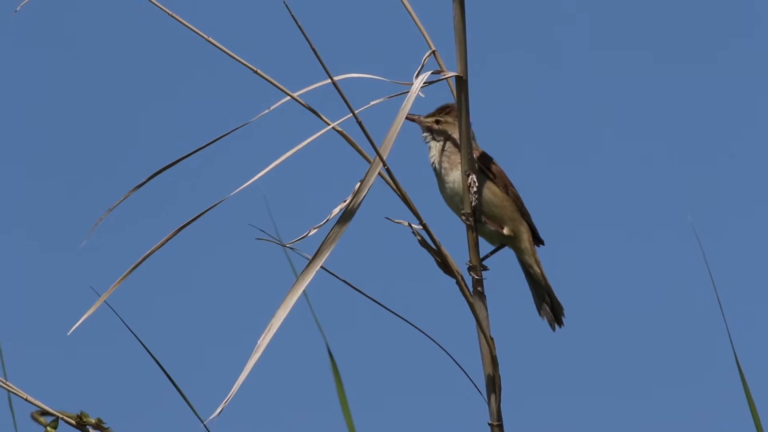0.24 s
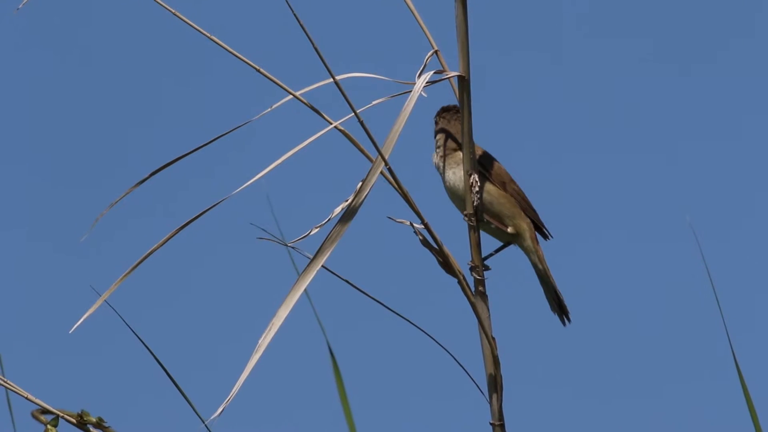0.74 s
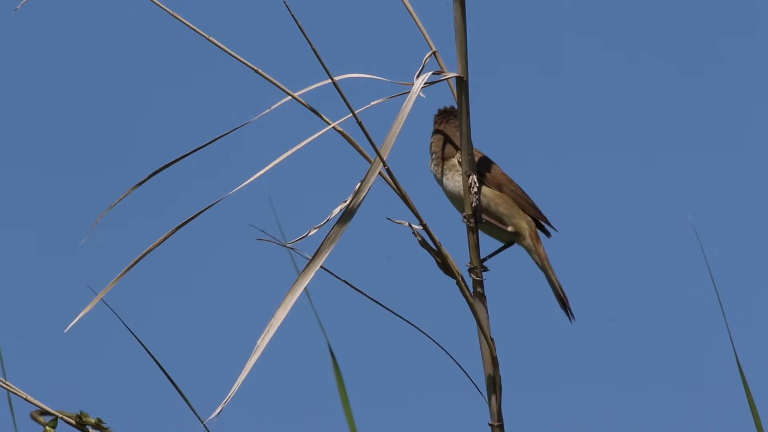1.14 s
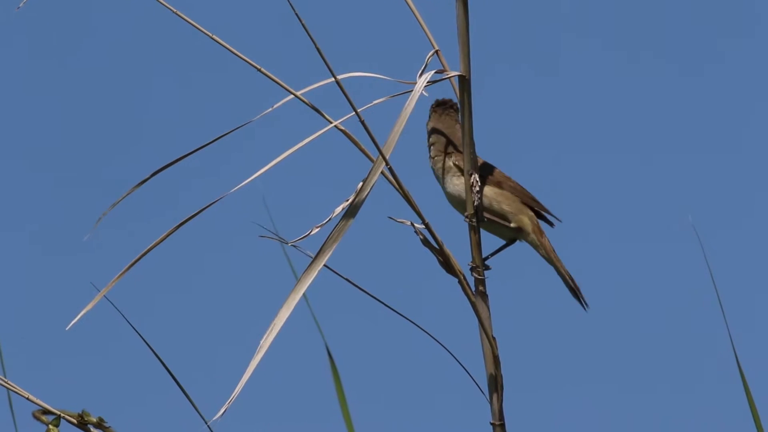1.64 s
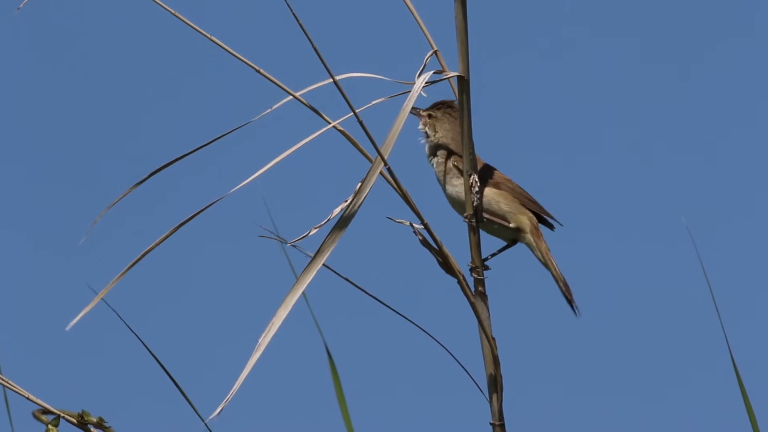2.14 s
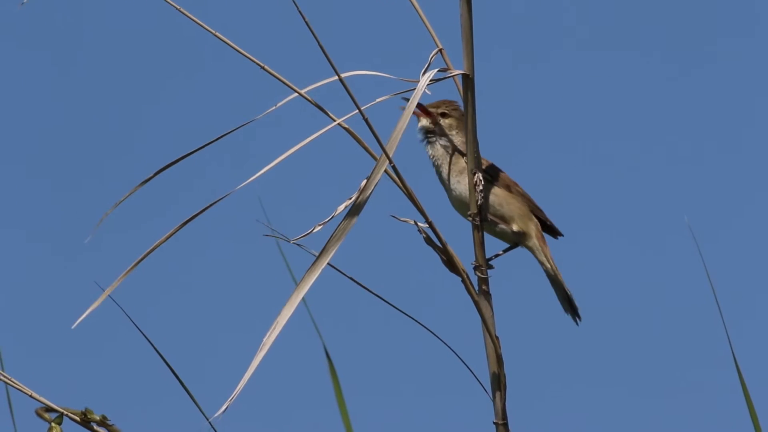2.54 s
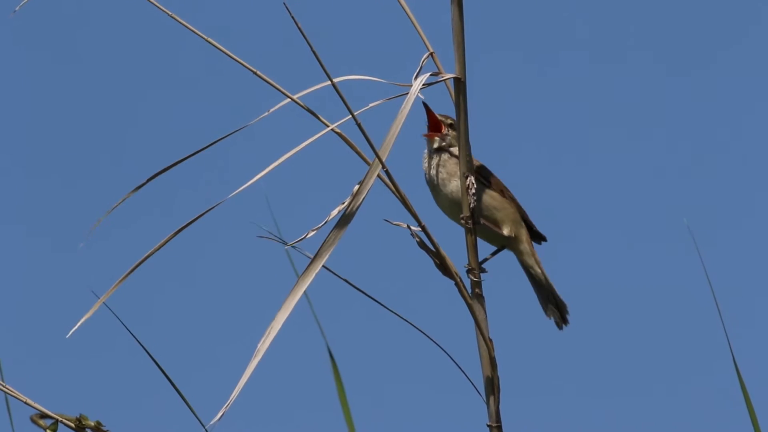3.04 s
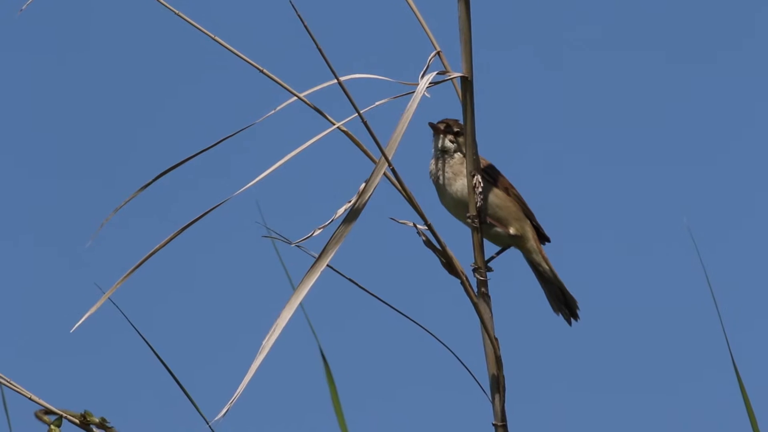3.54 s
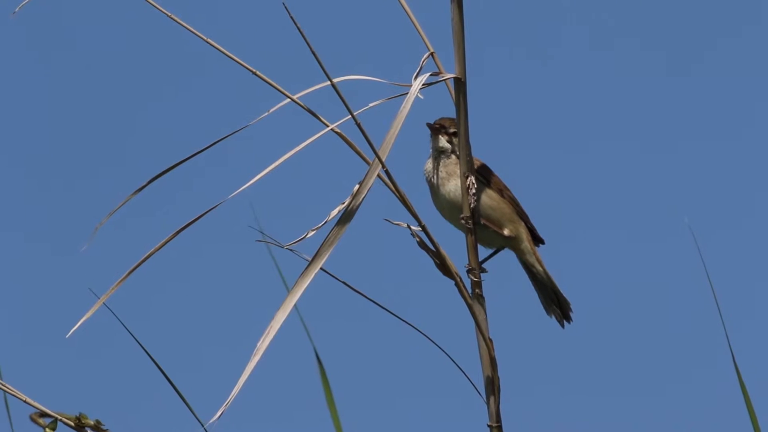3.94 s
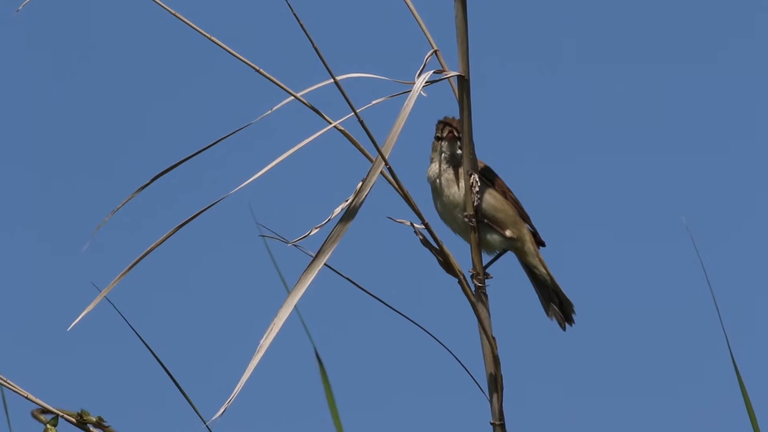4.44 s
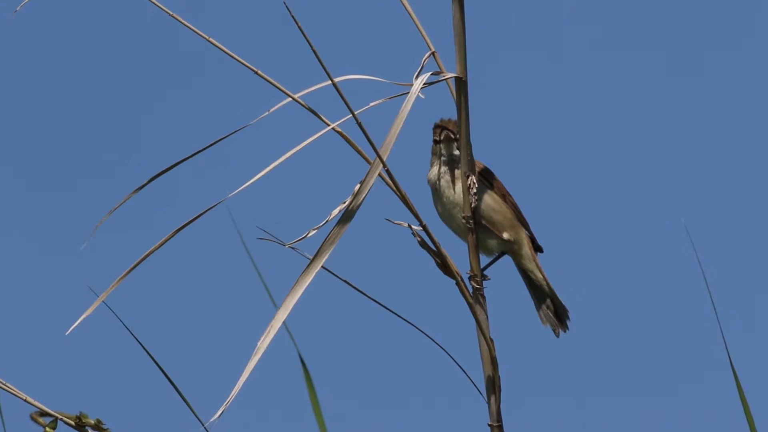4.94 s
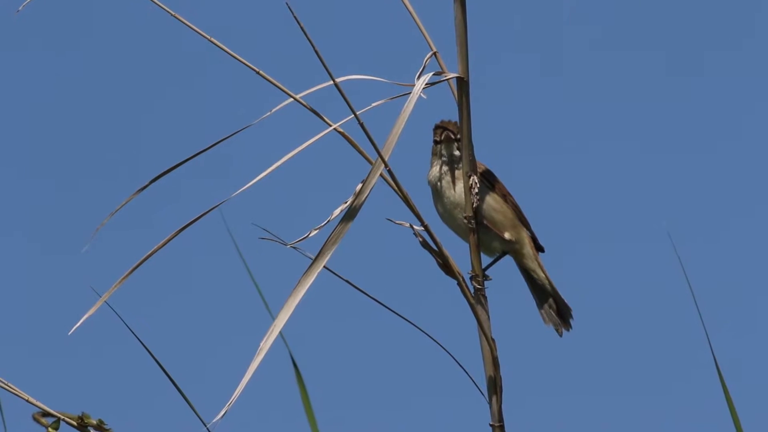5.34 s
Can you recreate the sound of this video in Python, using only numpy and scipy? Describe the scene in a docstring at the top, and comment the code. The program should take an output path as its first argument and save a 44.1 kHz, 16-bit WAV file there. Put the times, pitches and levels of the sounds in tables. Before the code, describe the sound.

Harsh, rhythmic reed warbler song with paired croaks, rattling trills and sharp whistles, then a pause and two soft creaks, outdoors.

```python
"""A steady outdoor rush, shaped noise, runs throughout, with faint rasps and chirps of far birds now and then.
Close by, a reed warbler sings four 'kr-ko' pairs: overtone-rich pulse trains, then fluttering tones.
Runs of fluttering bursts grate between paired arched whistles; short creaks lead into three loud,
harsh 'kee-chi' pairs, again pulse trains. After a pause come two soft creaks, each with a dry tick.
Decaying noise stands for the reed bed that scatters every bird's sound."""
import sys
import numpy as np
from scipy import signal
from scipy.fft import rfft, irfft, next_fast_len
from scipy.io import wavfile
from scipy.ndimage import uniform_filter1d, map_coordinates

SR = 44100
rng = np.random.default_rng(int(sys.argv[2]) if len(sys.argv) > 2 else 0)


def transcribe(u):
    """Save the signal u as a 16-bit wav file named by the first command-line argument.

    u: samples, shape (n,) or (channels, n), limited to [-1, 1]; the rate is SR.
    q: integer samples, one column per channel.
    """
    v = np.clip(np.atleast_2d(u).T, -1, 1)
    q = np.round(v * 32767).astype(np.int16)
    wavfile.write(sys.argv[1], SR, q)


N = 246959
TOP_HZ = 15900  # upper band limit


def amp(db):
    """Logarithmic level: decibels become an amplitude gain."""
    return 10 ** (np.asarray(db) / 20)


def unit(x):
    """Power normalization: the signal is scaled to rms 1."""
    return x / np.sqrt(np.mean(x ** 2) + 1e-20)


def along(points, hz):
    """Logarithmic frequency scale: (frequency [Hz], value) points are joined along it."""
    f, v = np.transpose(points)
    return np.interp(np.log(hz + 1), np.log(f + 1), v)


def wobble(rate, size):
    """Band-limited fluctuation: a smooth curve through random knots, rate of them a second."""
    knots = rng.standard_normal(int(size * rate / SR) + 4)
    return map_coordinates(knots, [np.arange(size) * rate / SR + 1])


def turn(hz):
    """Phase accumulation: instantaneous frequency sums to running phase [rad]."""
    return 2 * np.pi * np.cumsum(hz) / SR


def coloured(x, spectrum, size=4096):
    """Minimum-phase filtering: a folded cepstrum gives a causal filter of (Hz, dB) colour."""
    cepstrum = irfft(np.log(amp(along(spectrum, np.fft.rfftfreq(size, 1 / SR)))))
    cepstrum[1:size // 2] *= 2
    cepstrum[size // 2 + 1:] = 0
    impulse = irfft(np.exp(rfft(cepstrum)))
    return signal.fftconvolve(x, impulse)[:len(x)]


def add(track, s, sound):
    """Superposition: a sound sums into the track from time s."""
    room = track[max(round(s * SR), 0):][:len(sound)]
    room += sound[:len(room)]


def envelope(attack_s, hold_s, release_s, rise_db, sag_db, fall_db):
    """Piecewise exponential envelope: time [s] and level [dB] of a rise, a sagging hold and a fall."""
    corners = np.cumsum([0, attack_s, hold_s, release_s])
    t = np.arange(int(corners[-1] * SR)) / SR
    return t, np.interp(t, corners, [-rise_db, 0, -sag_db, -sag_db - fall_db])


def swell(length):
    """Half-sine window: a rounded rise and fall over length seconds."""
    return np.sin(np.linspace(0, np.pi, int(length * SR)))


def bump(x, centre, width):
    """Gaussian weighting: a bell curve of height 1."""
    return np.exp(-((x - centre) / width) ** 2)


def glide(t, first, last):
    """Linear glide: a straight slide over as many points as t has."""
    return np.linspace(first, last, len(t))


# colour of the outdoor rush: (frequency [Hz], relative spectral density [dB per Hz])
RUSH_SPECTRUM = [(15, -49.5), (25, -32), (53, -9.5), (86, -22.5), (133, -10.5), (248, -6.5), (276, -4.5),
                 (527, -4), (604, -2), (1150, -2.5), (1360, -2.5), (1780, -12.5), (2660, -15), (4820, -27),
                 (15800, -33)]
RUSH_DB = -41  # mean rms level


def rush():
    """Shaped broadband noise: a steady rush whose level drifts by fractions of a decibel."""
    noise = unit(coloured(rng.standard_normal(N), RUSH_SPECTRUM))
    drift_db = wobble(3, N) / 4
    return amp(RUSH_DB + drift_db) * noise


# another warbler, far off: (middle time [s], length [s], peak level [dB], throat frequency factor [1])
FAR_RASPS = [(0.032, .052, -48, 0.92), (1.094, 0.062, -46.5, 1.21), (3.76, .18, -51.5, 1),
             (3.991, 0.19, -53.5, 0.96), (4.36, .25, -57, 0.88), (4.831, .047, -51, 0.91),
             (4.931, 0.055, -35.5, 1.01)]
# colour of its throat at factor 1: (frequency [Hz], gain [dB])
FAR_THROAT = [(1200, -38), (1900, -4), (2600, 5.5), (3400, 0), (4200, -18), (6000, -30), (12000, -40)]


def far_rasps():
    """Source-filter principle: grainy noise is shaped by throat resonances."""
    out = np.zeros(N)
    for s, length, db, factor in FAR_RASPS:
        shape = swell(length)
        grain = amp(1.6 * wobble(151, len(shape))) * rng.standard_normal(len(shape))
        throat = np.multiply(FAR_THROAT, [factor, 1])
        add(out, s - length / 2, amp(db) * shape * unit(coloured(grain, throat)))
    return out


def chirp(length, from_hz, to_hz):
    """Linear frequency modulation: a thin gliding tone under a rounded envelope."""
    shape = swell(length)
    return shape * np.sin(turn(glide(shape, from_hz, to_hz)))


# short falling chirps: (time [s], length [s], first pitch [Hz], fall [share of pitch], peak level [dB])
CHIRPS = [(.01, .045, 8000, .18, -52), (0.198, 0.024, 4800, .11, -41.5), (.468, .014, 7650, .08, -49),
          (0.491, .017, 7600, .07, -46), (0.565, .049, 4520, .02, -39), (.656, 0.019, 4240, .07, -43),
          (.721, .016, 4360, .12, -43.5), (0.783, .015, 4500, .14, -44.5), (3.831, .014, 4380, .07, -45.5),
          (4.458, .02, 4190, .06, -53)]
# an upward flick, then a falling chirp: (time [s], chirp length [s], chirp peak level [dB])
FLICKS = [(.307, .026, -46.5), (.35, .037, -42.5)]
FLICK_S, FLICK_FROM_HZ, FLICK_TO_HZ = 0.014, 4700, 6400
FLICK_CHIRP_HZ, FLICK_SAG_HZ_PER_S = 5150, 22000  # first pitch and fall rate of the chirp that follows


def far_chirps():
    """Frequency glides: small birds sing thin falling tones, some after an upward flick."""
    out = np.zeros(N)
    for s, length, hz, fall, db in CHIRPS:
        add(out, s, amp(db) * chirp(length, hz, hz * (1 - fall)))
    for s, length, db in FLICKS:
        add(out, s, amp(db - 1.5) * chirp(FLICK_S, FLICK_FROM_HZ, FLICK_TO_HZ))
        end_hz = FLICK_CHIRP_HZ - FLICK_SAG_HZ_PER_S * length
        add(out, s + FLICK_S, amp(db) * chirp(length, FLICK_CHIRP_HZ, end_hz))
    return out


SURGE_LIMIT = 0.36  # share of each sudden surge, in dB, that the limited airflow takes back


def buzz(rate, db, roughness, resonance, throat, jitter, rough, shimmer_db, smear, focus_db):
    """Pulsed voicing: the syrinx shuts hundreds of times a second; overtones and puffs ring the throat."""
    n = len(rate)
    phase = turn(rate * (1 + jitter * roughness * wobble(616, n)))
    k = np.arange(1, int(SR / 2 / rate.min()))[:, None]  # overtone numbers
    hz = k * rate
    # two throat resonances glide together and lift the overtones that they pass
    lift = bump(hz, resonance, 260) + 0.24 * bump(hz, 1.51 * resonance, 300)
    # rough voicing shakes the high overtones most
    unrest = roughness * hz / 3500 * np.array([wobble(167.4, n) for _ in k])
    patches_db = 2.84 * np.array([wobble(118, n) for _ in k])  # each overtone waxes and wanes
    # a lag that grows as k squared makes each pulse a quick sweep
    lag = smear * k ** 2 + .5 * rng.standard_normal(k.shape) + 1.77 * unrest
    overtones = amp(focus_db * lift + patches_db) * np.cos(k * phase + lag)
    pulses = np.sum(overtones * (hz < TOP_HZ), axis=0)
    puffs = rng.standard_normal(n) * np.exp(0.16 * np.cos(phase - 1))
    shimmer = amp(shimmer_db * roughness * wobble(452, n))
    source = (unit(pulses) + rough * roughness * unit(puffs)) * shimmer
    voice = unit(coloured(source, throat))
    surge = uniform_filter1d(np.abs(signal.hilbert(voice)), size=44)  # 1 ms mean of the envelope
    return amp(db) * unit(voice / np.maximum(surge, 1) ** SURGE_LIMIT)


# 'kr': (time [s], peak level [dB], top pulse rate [Hz], nominal throat resonance within its glide [Hz])
KR_NOTES = [(.098, -19.5, 776, 3250), (0.5033, -18.5, 827, 3420), (.859, -15, 825, 3560),
            (1.209, -16.5, 818, 3470)]
# colour of throat and beak in 'kr': (frequency [Hz], gain [dB])
KR_THROAT = [(530, -43), (900, -24), (1040, -28), (1400, -38), (1560, -17), (1750, -21), (3000, -7.5),
             (3220, 1), (3580, -3.5), (5630, -13.5), (6350, -23.5), (9740, -34), (15500, -58)]
KR_SWELL_S, KR_HOLD_S, KR_RELEASE_S = .0205, 0.0058, .006
KR_START_HZ = 291.8  # pulse rate at no effort
KR_ROUGH, KR_END_EFFORT = 0.47, .6  # nominal roughness; closing drive before its bend, as a share of the top


def kr_notes():
    """Effort-driven pulse rate: 'kr' swells, quickening and roughening, then slackens and breaks off."""
    out = np.zeros(N)
    for s, db, top_hz, resonance_hz in KR_NOTES:
        t, level = envelope(KR_SWELL_S, KR_HOLD_S, KR_RELEASE_S, rise_db=29.5, sag_db=2, fall_db=22)
        effort = np.interp(t, [0, KR_SWELL_S, t[-1]], [0, 1, KR_END_EFFORT]) ** 1.3
        rate = KR_START_HZ + (top_hz - KR_START_HZ) * effort
        roughness = KR_ROUGH * effort * glide(t, 1.45, .5)
        resonance = resonance_hz * glide(t, 1.32, 0.83)
        note = buzz(rate, db + level, roughness, resonance, KR_THROAT,
                    jitter=0.072, rough=0.98, shimmer_db=6.0, smear=0.061, focus_db=3.0)
        add(out, s, note)
    return out


# colour of the hiss in a fluttering tone: (frequency [Hz], gain [dB])
RASP_HISS = [(600, -34.5), (1200, 0.5), (3600, 4), (4800, -17.5), (7000, -20), (9500, -16.5), (10600, -21),
             (11700, -15.5), (13000, -30), (15000, -31)]


def rasp(hz, beat_hz, depth, skew, hiss_db):
    """Joint amplitude and phase modulation: an uneven syrinx flutter chops and bends a tone; rms 1."""
    n = len(hz)
    beat = turn(beat_hz * (1 + 0.15 * wobble(398, n))) + rng.uniform(0, 2 * np.pi)
    opening = np.exp(depth * np.cos(beat))
    bend = skew * np.cos(beat - .45)  # the pitch rises as the valve opens
    phase = turn(hz * (1 + 0.043 * wobble(740, n))) + bend
    hiss = unit(coloured(rng.standard_normal(n), RASP_HISS))
    return unit(opening * (np.sin(phase) + amp(hiss_db) * hiss))


# 'ko': (time [s], level before the throb [dB], first pitch [Hz])
KO_NOTES = [(.161, -17.5, 2670), (.567, -16.5, 2672), (.924, -14.5, 2627), (1.272, -16, 2690)]
KO_ATTACK_S, KO_FADE_S, KO_RELEASE_S = 0.0042, .031, 0.0018
KO_LOW_HZ, KO_SLIDE_S = 1419, .0125  # pitch approached, and time constant of the slide
THROB_HZ, THROB_DB = 120, 4.5  # rate and depth of the level dips


def ko_notes():
    """Exponential relaxation: 'ko' slides to a low pitch and throbs as it fades."""
    out = np.zeros(N)
    t, level = envelope(KO_ATTACK_S, KO_FADE_S, KO_RELEASE_S, rise_db=17, sag_db=12.5, fall_db=13)
    throb = THROB_DB * np.cos(np.pi * THROB_HZ * t) ** 4
    loosening = glide(t, 0.32, 0.49)  # the flutter deepens as the pitch drops
    for s, db, first_hz in KO_NOTES:
        hz = KO_LOW_HZ + (first_hz - KO_LOW_HZ) * np.exp(-t / KO_SLIDE_S)
        tone = rasp(hz, beat_hz=482, depth=loosening, skew=1.83 * loosening, hiss_db=-13.0)
        add(out, s, amp(db + level - throb) * tone)
    return out


# grating syllables; levels and pitches are the trend before accents and slackening:
# (middle of first burst [s], time stretch [1], opening level [dB], closing level [dB],
#  opening pitch [Hz], closing pitch [Hz], accent on the last burst but one [dB])
SYLLABLES = [(1.5571, .97, -20.5, -14.5, 2780, 2640, -1.5), (1.67, 0.99, -15, -16, 2880, 2656, 2),
             (1.932, .995, -19, -15, 2920, 2530, 1), (2.0458, 1.01, -17, -13.5, 2844, 2605, -0.5),
             (2.1757, 1, -15, -14, 2726, 2600, 0), (2.4351, 1.01, -16, -14.5, 3080, 2507, 5),
             (2.5564, 1.027, -12.5, -14.5, 2736, 2576, 3.5)]
BURST_S = .0084
BURST_GAP_S, SLACK_GAP_S = .0082, .0038  # before stretch: time between bursts, and what full slack adds
SLACK_AT, SLACK_WIDTH = 0.48, .26  # shares of the run of bursts
SLACK_DROP, SLACK_DB = 0.325, 11.5  # share of pitch and level lost at full slack
FIRST_BURST_DB, LAST_BURST_DB = -5.5, -5.5  # level offsets
HISS_DB, HISS_GROWS = -13, 0.19  # hiss in the loudest burst; dB less of it for each dB softer


def grating(count=9):
    """Tension-controlled oscillation: midway the syrinx slackens; bursts come lower, softer, slower."""
    out = np.zeros(N)
    shape = swell(BURST_S)
    progress = np.linspace(0, 1, count)
    slack = bump(progress, SLACK_AT, SLACK_WIDTH)
    gaps = BURST_GAP_S + SLACK_GAP_S * (slack[1:] + slack[:-1]) / 2
    times = np.append(0, np.cumsum(gaps))
    for s, stretch, opening_db, closing_db, opening_hz, closing_hz, accent_db in SYLLABLES:
        levels = glide(progress, opening_db, closing_db) - SLACK_DB * slack
        levels[[0, -2, -1]] += [FIRST_BURST_DB, accent_db, LAST_BURST_DB]
        pitches = glide(progress, opening_hz, closing_hz) * (1 - SLACK_DROP * slack)
        for at, hz, db in zip(s + stretch * times, pitches, levels):
            loose = (2300 / hz) ** 0.64  # the lowest bursts flutter most
            hiss_db = HISS_DB + HISS_GROWS * (db - levels.max())
            falling_hz = hz * glide(shape, 1.048, 0.92)
            burst = rasp(falling_hz, beat_hz=482.0, depth=0.27 * loose, skew=0.96 * loose, hiss_db=hiss_db)
            add(out, at - BURST_S / 2, amp(db) * shape * burst)
    return out


# whistles, in pairs: (time [s], length [s], nominal top pitch [Hz], level [dB], upward crack [share of pitch])
WHISTLES = [(1.795, 0.036, 5230, -19, 0.012), (1.836, 0.038, 5240, -14.5, 0.14),
            (2.297, 0.038, 5334, -16.5, 0), (2.339, .036, 5220, -12, 0.19), (2.690, .032, 5260, -16, 0),
            (2.732, 0.035, 5326, -10.5, 0.12)]
WHISTLE_RISE_S, WHISTLE_SCOOP = 0.00248, .38  # time constant and depth (share of pitch) of the opening rise
WHISTLE_DROP, DROP_POWER = 0.38, 5.2  # closing fall as a share of pitch, and its bend
LOUDEST_AT = .57  # share of the length
CRACK_AT_S, CRACK_S = 0.01065, 0.0021  # middle and width of the crack
CLEAN_FLUTTER, FALL_FLUTTER = 0.0037, 0.032  # shares of pitch
CRACK_FLUTTER = 0.41  # share of pitch per unit of crack


def whistles():
    """Nonlinear oscillation: arched tones with weak overtones flutter where they crack and fall."""
    out = np.zeros(N)
    for s, length, top_hz, db, crack in WHISTLES:
        loudest_s = LOUDEST_AT * length
        t, level = envelope(loudest_s, (1 - LOUDEST_AT) * length, .001, rise_db=17, sag_db=20, fall_db=10)
        n = len(t)
        scoop = np.exp(-t / WHISTLE_RISE_S)
        cracking = crack * bump(t, CRACK_AT_S, CRACK_S)
        drop = WHISTLE_DROP * (t / length) ** DROP_POWER
        hz = top_hz * (1 - WHISTLE_SCOOP * scoop + cracking - drop)
        level = level - 13 * scoop - 42 * cracking  # thin until it settles, and choked where it cracks
        falling = np.clip((t - loudest_s) / 0.0029, 0, 1)
        flutter = CLEAN_FLUTTER + FALL_FLUTTER * falling + CRACK_FLUTTER * cracking
        phase = turn(hz * (1 + flutter * wobble(1110, n)))
        tone = amp(level + 59 * flutter * wobble(566, n)) * np.sin(phase)
        overtones = amp(level / 2) * (amp(-28.0) * np.sin(2 * phase) + amp(-41) * np.sin(3 * phase))
        halfway = amp(2 * level + db - 17) * np.sin(3 * phase / 2)  # the period doubles when driven hardest
        air = amp(level / 2 - 25.5) * unit(coloured(rng.standard_normal(n), CHI_THROAT))
        add(out, s, amp(db) * np.sqrt(2) * (tone + overtones + halfway + air))
    return out


# colour of throat and beak in creaks and ticks: (frequency [Hz], gain [dB])
CREAK_THROAT = [(1000, -35), (1900, -11), (2600, 2), (3200, -1), (3800, 1), (4500, 0.5), (5800, -4.5),
                (7000, 5), (9500, -1), (12000, -14), (15000, -19)]


def scrape(length, hz, swing):
    """Source-filter principle: a short fluttering tone, swing radians deep, is shaped by the throat."""
    shape = swell(length)
    burst = rasp(np.full(len(shape), hz), beat_hz=600, depth=0.28 * swing, skew=swing, hiss_db=-6)
    return shape * unit(coloured(burst, CREAK_THROAT))


# swelling creaks: (middle of last burst [s], length [s], pitch [Hz], last burst level [dB], flutter swing [rad])
CREAKS = [(2.848, 0.023, 3280, -21, 0.78), (3.0332, .019, 3210, -21, .25),
          (3.2155, 0.018, 3490, -25.5, 0.51), (5.337, 0.048, 2840, -28.5, 1.13),
          (5.4957, 0.059, 3117, -25, 0.84)]
CREAK_GAP_S, CREAK_QUICKEN = .0098, .89  # last gap; each earlier gap over the next
CREAK_SWELL_DB, CREAK_CURVE = 17, 1.14  # rise over the full length, and its bend
# dry ticks that answer the two soft creaks: (middle time [s], pitch [Hz], level [dB])
TICKS = [(5.372, 4200, -32), (5.531, 4460, -28.5)]
TICK_S = .011


def creaks(count=9):
    """Relaxation-like pulse runs: bursts slow down and swell toward their end; ticks are single bursts."""
    out = np.zeros(N)
    gaps = CREAK_GAP_S * CREAK_QUICKEN ** np.arange(count)
    leads = np.cumsum(gaps) - gaps  # how long each burst comes before the last
    for s, length, hz, db, swing in CREAKS:
        for lead, gap in zip(leads[leads < length], gaps):
            weaker_db = CREAK_SWELL_DB * (lead / length) ** CREAK_CURVE
            add(out, s - lead - gap / 2, amp(db - weaker_db) * scrape(1.03 * gap, hz, swing))
    for s, hz, db in TICKS:
        add(out, s - TICK_S / 2, amp(db) * scrape(TICK_S, hz, swing=1.65))
    return out


# 'kee': (time [s], level after the attack [dB], pulse rate [Hz], hold [s], sag in the hold, negative swells [dB])
KEE_NOTES = [(2.862, -8.5, 401, 0.029, 8), (3.046, -12, 401.2, 0.02, -1.5),
             (3.2292, -11.5, 404.7, 0.029, 4)]
# colour of throat and beak in 'kee': (frequency [Hz], gain [dB])
KEE_THROAT = [(470, -69), (800, -43), (1120, -12.5), (1330, -33), (1460, -25), (1730, -23), (2590, -9),
              (2820, -2), (3240, 0), (3450, -1.5), (4480, 2), (5140, -15), (6590, -20), (10100, -18.5),
              (15800, -52)]
KEE_ATTACK_S, KEE_RELEASE_S = 0.0038, 0.0094


def kee_notes():
    """Steady pulsed voicing: 'kee' bursts out rough and clears as its throat resonance sinks."""
    out = np.zeros(N)
    for s, db, rate_hz, hold_s, sag_db in KEE_NOTES:
        t, level = envelope(KEE_ATTACK_S, hold_s, KEE_RELEASE_S, rise_db=13.5, sag_db=sag_db, fall_db=31)
        rate = np.full(len(t), rate_hz)
        note = buzz(rate, db + level, glide(t, .98, 0.18), glide(t, 3480, 3330), KEE_THROAT,
                    jitter=0.015, rough=1.0, shimmer_db=1.5, smear=.45, focus_db=9)
        add(out, s, note)
    return out


# 'chi': (time [s], peak level [dB], first pulse rate [Hz], hold [s])
CHI_NOTES = [(2.914, -12, 551, 0.027), (3.096, -11, 553, 0.026), (3.282, -14.5, 562, 0.03)]
# colour of throat and beak in 'chi', also of the air in the whistles: (frequency [Hz], gain [dB])
CHI_THROAT = [(590, -50), (1000, -49), (1270, -37), (1550, -24), (1820, -23), (2070, -16.5), (2580, -28.5),
              (3170, -4.5), (3860, -9), (4380, -0.5), (5100, -12.5), (5850, -10.5), (6960, -20.5),
              (11300, -24.5), (15800, -46)]
CHI_ATTACK_S, CHI_RELEASE_S, CHI_SAG_HZ_PER_S = 0.0017, .016, 1900


def chi_notes():
    """Falling pulse rate: 'chi' starts abruptly, sags and clears as its throat resonance sinks."""
    out = np.zeros(N)
    for s, db, rate_hz, hold_s in CHI_NOTES:
        t, level = envelope(CHI_ATTACK_S, hold_s, CHI_RELEASE_S, rise_db=7, sag_db=1.5, fall_db=18)
        rate = rate_hz - CHI_SAG_HZ_PER_S * t
        note = buzz(rate, db + level, glide(t, 0.69, 0.4), glide(t, 3000, 2470), CHI_THROAT,
                    jitter=0.034, rough=1.0, shimmer_db=4, smear=.45, focus_db=8.0)
        add(out, s, note)
    return out


# decay of the reed bed: (frequency [Hz], time to fall 60 dB [s])
REED_DECAY = [(1000, 0.15), (3000, 0.2), (6000, 0.23), (12000, 0.29)]


def reed_bed(x, near_db, tail_db, far_db):
    """Diffuse scattering: near stems, the ringing bed and a faint far bank respond as decaying noise."""
    hz, t, z = signal.stft(rng.standard_normal(SR), SR, nperseg=256)
    bed = amp(tail_db - 60 * t / along(REED_DECAY, hz)[:, None])
    far_bank = amp(far_db - 60 * t / 1.0)  # falls 60 dB in 1 s
    tail = signal.istft(z * (bed + far_bank), SR, nperseg=256)[1]
    t = np.arange(len(tail)) / SR
    stems = amp(near_db - 60 * t / 0.012) * rng.standard_normal(len(t))  # falls 60 dB in 12 ms
    onset = 1 - np.exp(-t / 0.00095)
    return signal.fftconvolve(x, (tail + stems) * onset)[:N]


def scene():
    """Superposition: far birds, the singer, their scattered sound and the rush add up."""
    far = far_rasps() + far_chirps()
    singer = kr_notes() + ko_notes() + grating() + whistles() + creaks() + kee_notes() + chi_notes()
    birds = far + singer
    scattered = reed_bed(birds, near_db=-53, tail_db=-39.0, far_db=-68.5)
    return (birds + scattered + rush())[None]


def record(dry):
    """Band limitation: an ideal low-pass removes everything from TOP_HZ up."""
    m = next_fast_len(N + SR // 2)
    passed = np.fft.rfftfreq(m, 1 / SR) < TOP_HZ
    return irfft(rfft(dry, m) * passed, m)[..., :N]


dry = scene()
out = record(dry)
transcribe(out)
```